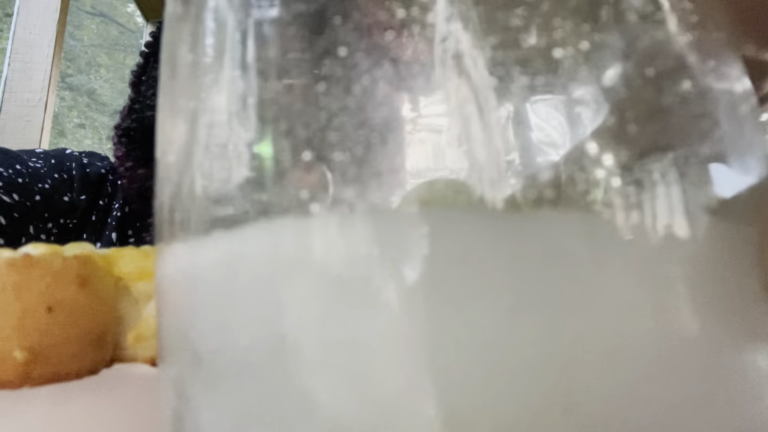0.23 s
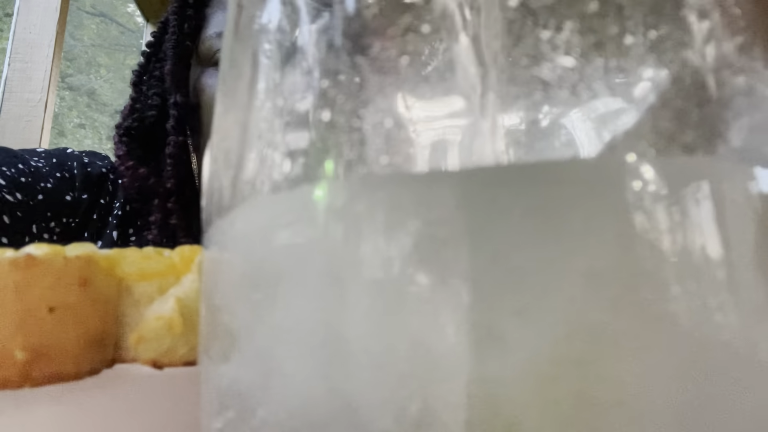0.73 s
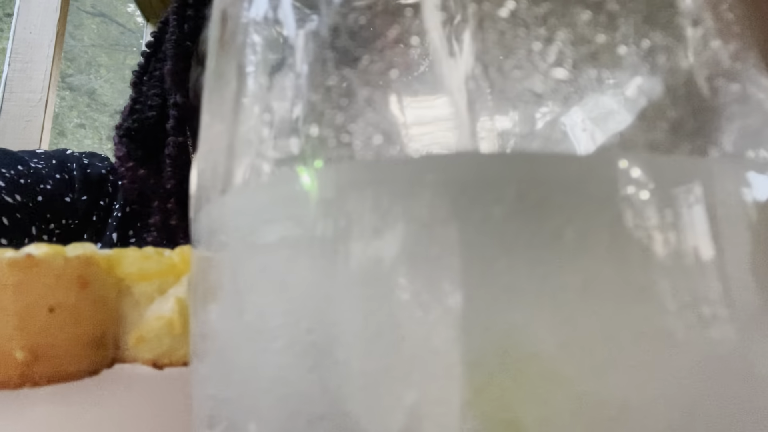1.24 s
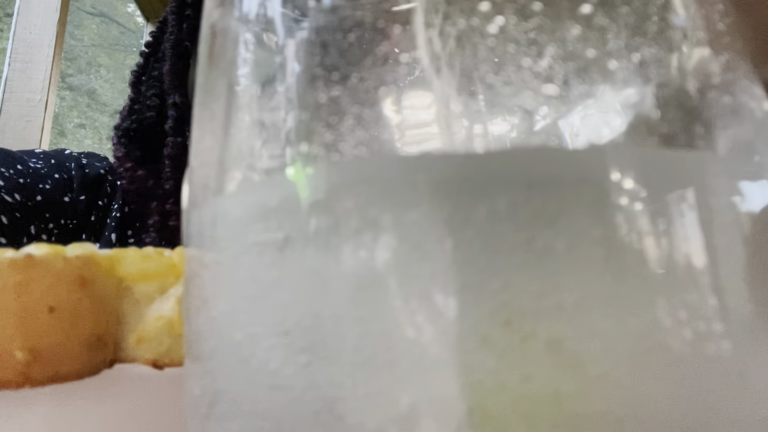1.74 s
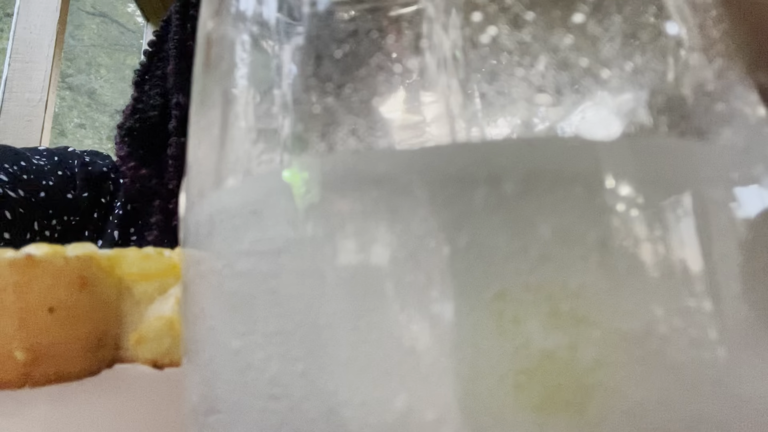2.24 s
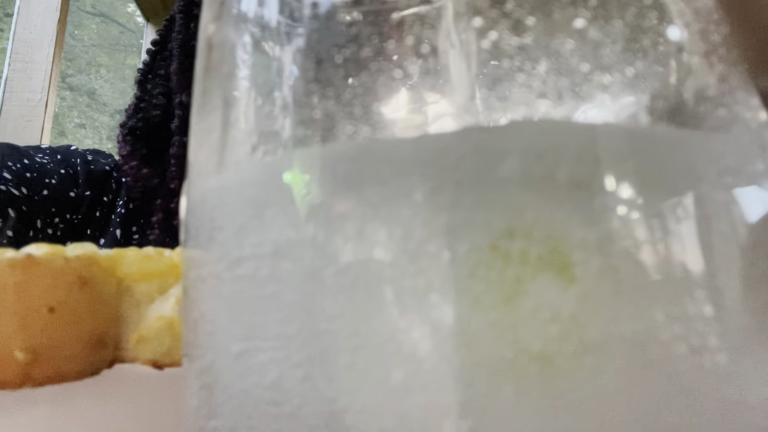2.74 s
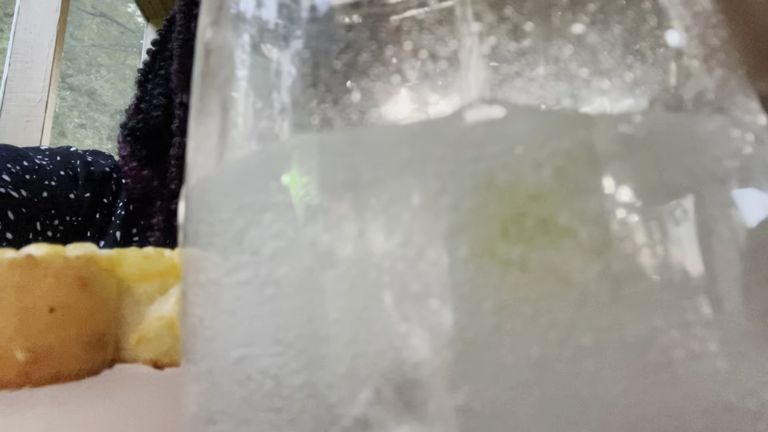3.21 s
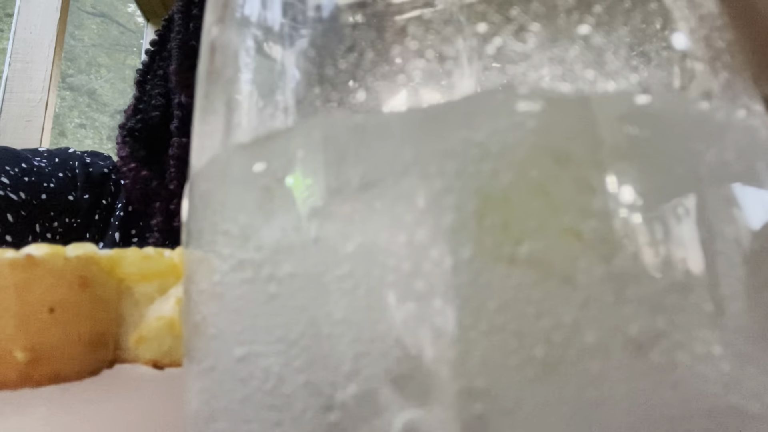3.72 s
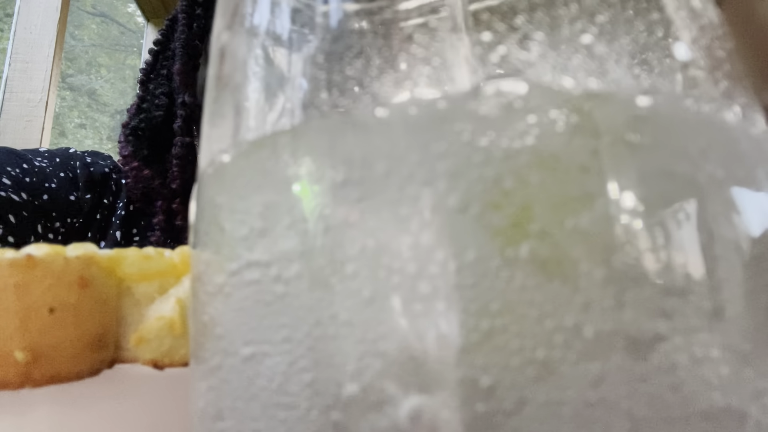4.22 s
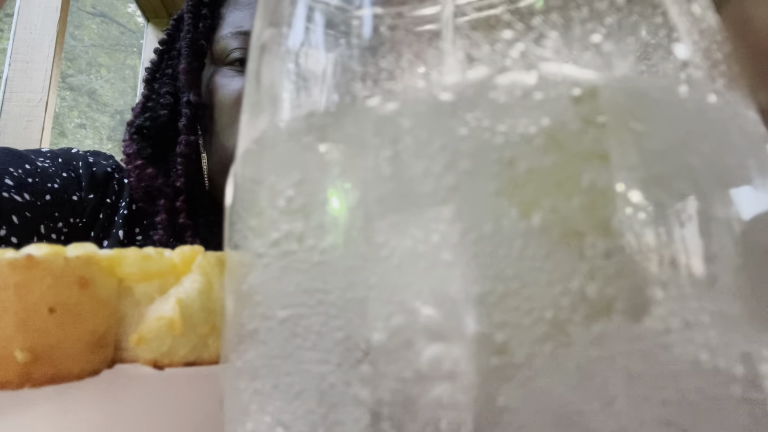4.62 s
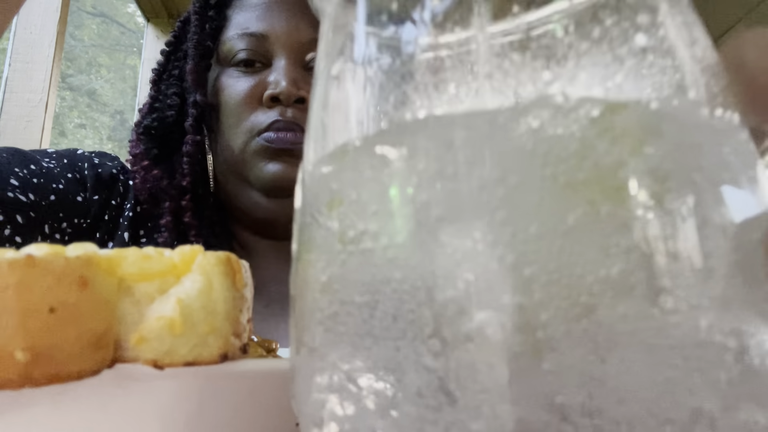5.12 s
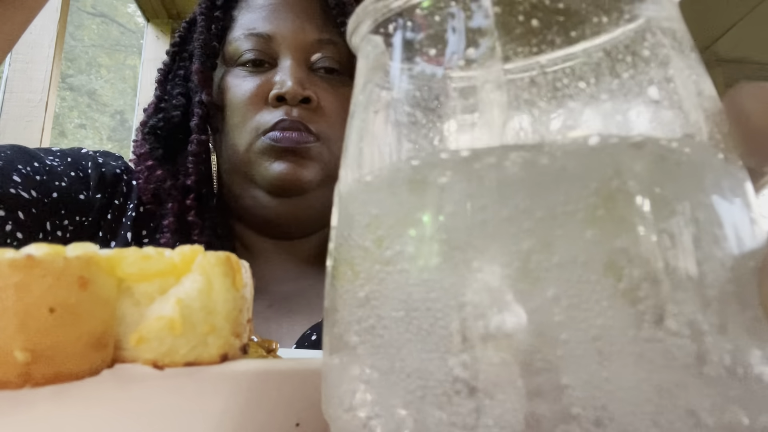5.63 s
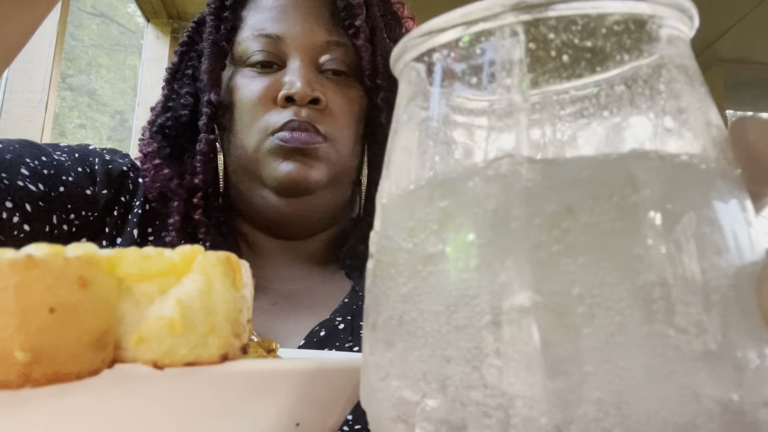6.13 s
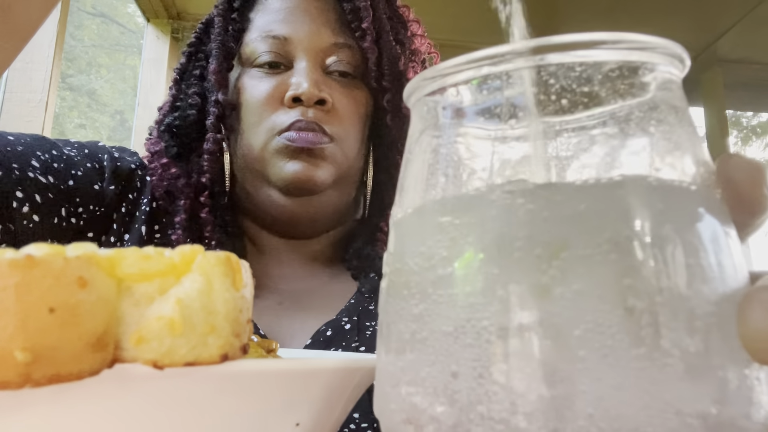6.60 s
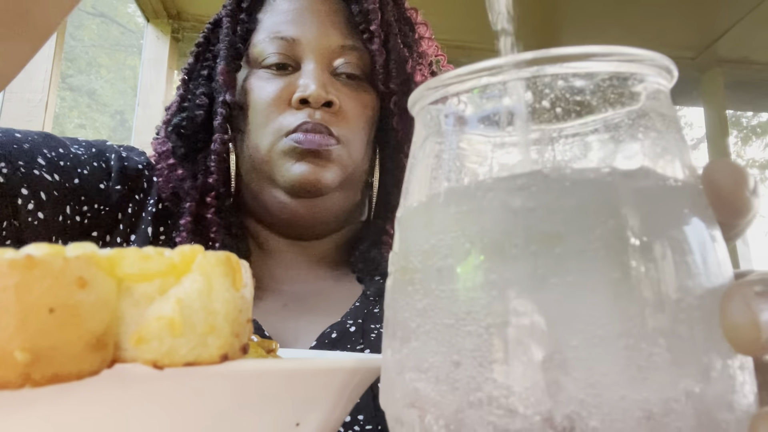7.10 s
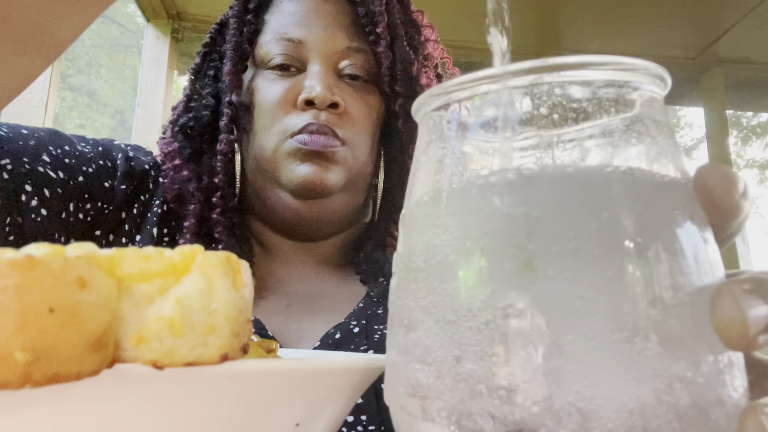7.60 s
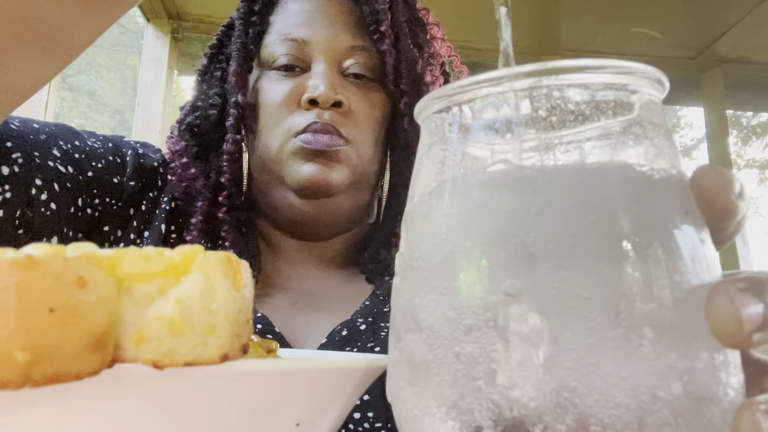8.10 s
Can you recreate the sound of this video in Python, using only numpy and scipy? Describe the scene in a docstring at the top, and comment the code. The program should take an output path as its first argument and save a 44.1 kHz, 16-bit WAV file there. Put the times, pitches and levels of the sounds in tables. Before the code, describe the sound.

Close fizzy pouring into an icy glass jar, with hollow bubbling, steady fine hiss, small glassy ice knocks, and quiet indoor hum.

```python
"""Sparkling water over ice

Indoors, a glass jar of ice and frozen fruit is filled with sparkling water close to a two-port microphone.
The stream drags air under: pulses gurgle and ring the jar's air. Random clicks hiss as foam, bubbles pop,
and ice strikes ringing glass modes. Farther off a house rumbles and hums, a lamp buzzes faintly
and a small bird whistles outside."""
import sys
import numpy as np
from scipy import signal
from scipy.fft import rfft, irfft, next_fast_len
from scipy.io import wavfile
from scipy.ndimage import uniform_filter1d

SR = 44100
rng = np.random.default_rng(int(sys.argv[2]) if len(sys.argv) > 2 else 0)


def output_pcm(signal):
    """Save a mono or channel-first signal as 16-bit PCM at the path in sys.argv[1].

    Samples are clipped to [-1, 1] before scaling.
    """
    pcm = np.clip(np.atleast_2d(signal).T, -1, 1) * 32767
    wavfile.write(sys.argv[1], SR, np.round(pcm).astype(np.int16))


N = 368235
T = np.arange(N) / SR   # s
HZ = np.fft.rfftfreq(next_fast_len(N), 1 / SR)

# strength of the stream, heard as the patter of small bubbles before the wall: start_s, level_db [rms]
STREAM = [(0, -41.5), (.16, -40), (.5, -43), (1.5, -46.5), (1.95, -42), (2.35, -45.5), (3.15, -41.5),
          (3.49, -45), (3.9, -44), (4.3, -43.5), (4.58, -43), (4.9, -47.5), (5.8, -50), (6.3, -45.5),
          (6.85, -40.5), (7.3, -43.5), (8.35, -48)]
# big bubbles, before the wall: peak_s, level_db [peak], pitch_hz
BIG_BUBBLES = [(0.1952, -27, 850), (0.2538, -26.5, 710.0), (0.3445, -24.5, 800), (0.592, -28.5, 870),
               (0.661, -26, 750), (0.823, -23, 780.0), (0.9286, -29, 756), (0.9496, -23.5, 720),
               (1.022, -31, 860), (1.1234, -25, 790), (1.198, -31, 805), (1.2529, -27.5, 780),
               (1.4046, -28, 790), (1.4312, -29.5, 810.0), (1.6574, -24, 778), (1.6656, -26, 830.0),
               (1.698, -24.5, 830), (1.7158, -23, 805), (1.7353, -20, 780), (1.778, -24.5, 750),
               (1.8048, -28, 820.0), (1.816, -24.5, 840.0), (1.875, -24.5, 850), (1.902, -20, 870),
               (1.9113, -25, 750), (1.984, -33, 830), (1.9929, -26, 610), (2.014, -29, 890.0),
               (2.081, -27.5, 820.0), (2.095, -21, 820), (2.157, -29, 890), (2.214, -23.5, 830),
               (2.2366, -26, 800.0), (2.2573, -26, 840.0), (2.3283, -26, 850.0), (2.4231, -29, 815),
               (2.521, -20.5, 840), (2.542, -24, 840.0), (2.5556, -17.5, 825), (2.564, -23, 690),
               (2.6461, -27, 810.0), (2.6824, -25, 860), (2.7231, -20, 770), (2.7916, -22.5, 790),
               (2.8251, -31, 920), (2.9135, -25, 900.0), (2.9976, -28, 950), (3.039, -25, 860.0),
               (3.0603, -22.0, 890), (3.078, -32, 850.0), (3.0914, -23, 860), (3.129, -31, 860.0),
               (3.1769, -20, 880), (3.196, -29, 857), (3.2169, -19, 840), (3.2498, -18.5, 880),
               (3.2804, -24, 890.0), (3.294, -18.5, 850), (3.3031, -24, 800.0), (3.333, -20.5, 923),
               (3.365, -25.5, 930.0), (3.401, -30, 876), (3.419, -26.5, 850.0), (3.4408, -33, 880.0),
               (3.4667, -27, 900.0), (3.596, -23.5, 900), (3.659, -27, 930.0), (3.7154, -28, 913),
               (3.8897, -23.5, 760), (3.9164, -24, 900.0), (3.927, -25, 740), (3.999, -26.0, 900),
               (4.0344, -28, 750.0), (4.054, -21.5, 690.0), (4.0696, -22.5, 680.0), (4.0915, -29, 885),
               (4.101, -28, 690.0), (4.1152, -20.5, 704), (4.1511, -20.5, 730), (4.4514, -32, 730),
               (4.4836, -24, 740), (4.53, -29, 794), (4.602, -26, 880.0), (4.614, -24, 750.0),
               (4.6318, -23.5, 755), (4.6675, -23, 910), (4.7041, -21.0, 860), (4.8964, -12, 1300.0),
               (5.0349, -20.5, 750), (5.074, -28, 700.0), (5.107, -19.5, 720), (5.165, -27, 810.0),
               (5.1803, -20.5, 720), (5.2658, -28, 784), (5.311, -22, 875), (5.3351, -25, 720.0),
               (5.392, -36, 745), (5.409, -23, 760), (5.5526, -25.5, 656), (5.7297, -30.5, 795),
               (5.936, -25.5, 740), (6.0326, -30, 785), (6.31, -28.5, 710), (6.465, -30, 720.0),
               (6.5111, -26, 710), (6.561, -23, 670.0), (6.609, -28.5, 700.0), (6.6454, -18, 764),
               (6.696, -16.5, 700), (6.786, -18, 754), (6.8266, -23.5, 740), (6.932, -27, 600.0),
               (6.9453, -27, 650.0), (6.9997, -27, 683), (7.0287, -20, 630), (7.0448, -24, 610),
               (7.0782, -28, 540), (7.114, -31, 580.0), (7.361, -29, 708), (7.386, -30.0, 670),
               (7.445, -33, 680.0), (7.5324, -26.5, 660.0), (7.568, -29, 680), (8.008, -28, 700.0)]
# air above the water; its bottle tone climbs overall as the jar fills (foam() plays the two rings):
# start_s, bottle_hz, bottle_db [re each bubble], lower_hz, lower_db [rms], upper_hz, upper_db [rms]
JAR_AIR = [(0, 797, -2, 2286, -64, 3460, -87), (1.299, 774, -6.5, 2443, -67.5, 3284, -61),
           (2.5, 830, -2, 2523, -60, 4210, -60), (3.501, 855, -5.5, 2435, -58.5, 4550, -61),
           (4.8, 954, -16, 2572, -69, 4550, -62), (5.4, 1049, -4.5, 2513, -65.5, 4590, -65),
           (6.5, 1090, -13.5, 2634, -63.5, 4580, -75), (7.3, 1190, -15, 2700, -58.5, 4520, -82),
           (8.35, 1230, -7.5, 2780, -57.5, 4580, -73)]
# what the wet glass wall lets through of the gurgle: pitch_hz, level_db
WALL = [(200, 1), (1150, -0.5), (1380, -0.5), (1620, -8), (1900, 1), (2250, -15), (4000, -2), (16000, -20)]
BUBBLE_LEAD_S = .0012   # a big bubble starts this long before its peak
SMALL_LOW_HZ, SMALL_HIGH_HZ = 522, 1178   # pitches of the small bubbles


def gurgle():
    """Each bubble is a short pulse at its own pitch and sets the bottle tone of the jar ringing."""
    tone_s, tone_hz, tone_db = np.transpose(JAR_AIR)[:3]
    when, size, tone = rng.random((3, 2900))
    small_hz = SMALL_LOW_HZ + (SMALL_HIGH_HZ - SMALL_LOW_HZ) * tone ** 1.1
    small = np.c_[when * N / SR, -3.8 * np.log(size + .08), small_hz]
    big = np.array(BIG_BUBBLES) - [BUBBLE_LEAD_S, 0, 0]

    def with_bottle_tone(rows):
        """The pulses plus the answer of the jar, each slightly detuned."""
        at = rows[:, 0]
        detune = 2 ** (0.082 * rng.standard_normal(len(at)))
        jar_db = rows[:, 1] + np.interp(at, tone_s, tone_db)
        jar = np.c_[at, jar_db, np.interp(at, tone_s, tone_hz) * detune]
        pulses = bubbles(rows, cycles=9.5, swell=0.06, rise=0.012, rough=0)
        return pulses + bubbles(jar, cycles=16.4, swell=0.63, rise=0.00052, rough=0)

    stream_db, = in_time(STREAM)
    patter = from_db(stream_db) * rms_one(with_bottle_tone(small))
    return filtered(patter + with_bottle_tone(big), response(WALL))


# the foam settles and the jar is drawn away: start_s, hiss_db [rms], sizzle_db [rms]
FOAM = [(0, -44.5, -49), (.9, -46.5, -55), (2.3, -48.5, -47.5), (3.4, -47, -51), (3.7, -50, -47),
        (4.6, -46.5, -53), (5.2, -45, -64), (6.4, -50, -55.5), (7.2, -52, -53), (8.35, -56.5, -54)]
# colour of the foam hiss: pitch_hz, level_db [relative, per Hz]
HISS = [(300, 9), (900, 9), (1300, -1), (1620, -10), (1900, 1.5), (2250, -20), (2600, -8.5), (3900, -4),
        (5200, 4), (7000, 3.5), (7800, -1.5), (9300, -2.5), (16000, -7)]
# colour of the fresh, deep foam on top of the hiss: pitch_hz, level_db
FRESH = [(1500, -3.5), (2340, -3), (2750, -2), (3430, 12), (4050, -5), (4640, 5.5), (5400, -5),
         (6200, -1.5), (16000, 5)]
# colour of the fine spray: pitch_hz, level_db [relative, per Hz]
SIZZLE = [(6000, 4), (8500, 10), (10500, 0.5), (12500, -0.5), (14500, 2), (16000, -32)]
FRESH_UNTIL_S = 1.46   # the fresh colour is gone by then
LOWER_WIDTH_HZ, UPPER_WIDTH_HZ = 230, 480   # half widths of the two air rings


def foam():
    """Tiny bubbles burst by the thousand; finer spray sizzles above; the air in the jar rings along."""
    flicker = from_db(1.2 * drift(25))
    hiss = coloured(grains(9000 * flicker, spread_db=3.0), HISS)
    fresh = np.clip(1 - T / FRESH_UNTIL_S, 0, 1) ** .5
    hiss = (1 - fresh) * hiss + fresh * filtered(hiss, response(FRESH))
    sizzle = coloured(grains(5000 * flicker, spread_db=3.0), SIZZLE)
    hiss_db, sizzle_db = in_time(FOAM)
    lower_hz, lower_db, upper_hz, upper_db = in_time(JAR_AIR)[2:]
    air = from_db(lower_db) * air_ring(lower_hz, LOWER_WIDTH_HZ)
    air = air + from_db(upper_db) * air_ring(upper_hz, UPPER_WIDTH_HZ)
    return from_db(hiss_db) * hiss + from_db(sizzle_db + 2.24 * drift(13)) * sizzle + air


def air_ring(hz, half_width_hz):
    """Grains smoothed into a band about zero hertz, carried up onto a moving resonance."""
    carrier = 2 * np.pi * np.cumsum(hz) / SR
    band = 1 / (1 + (HZ / half_width_hz) ** 4)
    a, b = (filtered(grains(900, spread_db=5.0), band) for _ in range(2))
    return rms_one(a * np.cos(carrier) + b * np.sin(carrier))


# bubbles bursting on top, nominal levels before the ragged noise: start_s, level_db [peak], pitch_hz
POPS = [(.0598, -24, 7400), (.2666, -29, 12400), (.5685, -28, 11000), (.7893, -34, 6240),
        (1.0926, -35, 6070), (1.1415, -33, 11800), (1.2592, -31, 10800), (1.7528, -31, 7400),
        (2.1927, -27.5, 12200), (2.5902, -30.5, 12000), (2.7082, -35, 5200), (2.9369, -33, 7200),
        (3.2072, -34, 12200), (3.4384, -28, 7440), (3.4592, -28.5, 7050), (3.575, -36, 11400),
        (3.6557, -26, 10340), (3.7, -30, 11460), (3.7485, -33, 11300), (3.8566, -30, 7200),
        (3.911, -37, 11000), (4.0672, -29, 10100), (4.1667, -32, 10130), (4.1851, -30, 6700),
        (4.3552, -35, 6800), (4.4699, -31, 11900), (4.5265, -31, 11800), (5.1352, -27.5, 10600),
        (5.1595, -28, 6900), (5.3007, -29, 6100), (5.935, -29, 11400), (6.5372, -34, 6700),
        (6.5982, -33, 5970), (6.6286, -29.5, 6300), (6.6739, -28, 6730), (6.7343, -31, 6640),
        (6.8126, -28.5, 6300), (7.0132, -28.5, 10400), (7.1082, -35, 6340)]


def pops():
    """Larger bubbles burst, each a bright ragged ring of a few milliseconds; smaller ones crackle between."""
    when, size, tone = rng.random((3, 900))
    at = when * N / SR
    spray_s, _, spray_db = np.transpose(FOAM)
    crackle_db = 5 - 3.5 * np.log(size + .05) + np.interp(at, spray_s, spray_db)   # follows the spray
    crackle = np.c_[at, crackle_db, 5500 * 2 ** (1.25 * tone ** .7)]
    burst = bubbles(POPS, cycles=50.0, swell=0.8, rise=0.0005, rough=0.5)
    burst = burst + bubbles(crackle, cycles=24.0, swell=0.2, rise=0.002, rough=0.6)
    return signal.sosfilt(signal.butter(2, 2600, "high", fs=SR, output="sos"), burst)


# ice on glass: start_s, splash_db [nominal peak], thud_db [through the hand and table],
# spot_hz [pitch that the spot struck favours]
KNOCKS = [(2.156, -30, -54, 3120), (2.553, -44, -24.5, 902), (3.246, -34, -58, 2240),
          (3.4396, -34, -32, 3300), (4.0266, -39, -27.5, 1900), (4.29, -36.5, -44, 1877),
          (4.8963, -35.5, -24, 1450), (5.2323, -30, -38, 1840), (5.308, -35, -31, 1950),
          (5.336, -51, -55, 1950), (5.4041, -36.5, -34, 1850), (5.424, -41, -56, 2200),
          (5.68, -42, -56, 1900), (6.18, -37.5, -78, 1917), (6.6436, -31.5, -35, 1810),
          (6.651, -25, -48, 2150), (6.734, -40, -56, 2600), (6.7863, -32.5, -27.5, 2700),
          (7.1143, -32.5, -30.5, 2570), (7.2056, -27, -33, 2230), (7.47, -35, -60, 3260),
          (7.515, -34, -47, 1500), (7.531, -40, -64, 2600), (7.6, -42, -56, 1900), (8.0857, -37, -56, 1750),
          (8.133, -39, -56, 2680), (8.191, -37, -60, 3300), (8.251, -43, -58, 1840), (8.31, -48, -56, 1840)]
# modes of the wet glass: pitch_hz, level_db [relative], t60_s
GLASS = [(377, -10, .02), (790, 16, 0.041), (1180, -21, 0.017), (1530, -1, 0.017), (1860, 0, 0.027),
         (2040, -11, 0.026), (2510, -11, 0.022), (3090, -9.5, 0.043), (4750, -10, 0.022)]
TABLE_DB, RING_DB = -5.5, -1   # deep part against the thud; ring of the glass against the splash
OFF_SPOT_DB_PER_OCTAVE, BOUNCE_DB = 10.5, -5   # loss away from the favoured pitch; step per rebound


def ice():
    """Each knock rings every glass mode unevenly, rattles through three rebounds, splashes and thuds."""
    s, splash_db, thud_db, spot_hz = np.transpose(KNOCKS)
    thud = bubbles(np.c_[s, thud_db, 0 * s + 280], cycles=1.75, swell=0.3, rise=-0.0085, rough=0)
    deep = bubbles(np.c_[s, thud_db + TABLE_DB, 0 * s + 95], cycles=7.8, swell=0.72, rise=0, rough=0)
    splash = bubbles(np.c_[s, splash_db, 0 * s + 1100], cycles=10.0, swell=0.032, rise=0, rough=0.13)
    splash = signal.sosfilt(signal.butter(2, 2400, fs=SR, output="sos"), splash)
    out = thud + deep + splash
    gaps_s = np.c_[0 * s, rng.uniform(.002, .006, (len(s), 3))]
    touch = ((s[:, None] + np.cumsum(gaps_s, axis=1)) * SR).astype(int)
    for hz, level_db, t60 in GLASS:
        off_spot_db = OFF_SPOT_DB_PER_OCTAVE * abs(np.log2(hz / spot_hz))
        first_db = splash_db + level_db + RING_DB - off_spot_db
        uneven_db = 0.92 * rng.standard_normal(touch.shape)
        clicks = np.zeros(N)
        clicks[touch] = from_db(first_db[:, None] + BOUNCE_DB * np.arange(4) + uneven_db)
        out = out + ring(clicks, hz, t60)
    return out


# bird outside, each time it sings: start_s, level_db
PHRASES = [(2.086, -48.5), (2.535, -48.5), (2.983, -46), (3.445, -47.5), (7.305, -48.5), (7.758, -49),
           (8.205, -51)]
# one phrase: start_s, length_s, from_hz, to_hz, level_db [re the phrase]
NOTES = [(.005, .05, 2877, 3060, -1), (.062, .14, 4170, 4346, -3.5), (.2, .11, 3640, 3505, -2.5),
         (.255, 0.048, 2437, 2514, -0.5), (.27, .06, 2780, 2820, -10), (.4, 0.061, 2590, 2683, -8)]


def bird():
    """One phrase of gliding, hoarse whistles, repeated; moving leaves give each its own echoes."""
    out, t = np.zeros(N + 2 * SR), np.arange(SR // 4) / SR
    for start, phrase_db in PHRASES:
        phrase = np.zeros(SR // 2)
        for s, length, from_hz, to_hz, db in NOTES:
            u = np.linspace(0, 1, int(length * SR))
            rasp = rms_one(uniform_filter1d(rng.standard_normal(len(u)), size=180))
            glide_hz = from_hz + (to_hz - from_hz) * np.sqrt(u)
            phase = 2 * np.pi * np.cumsum(glide_hz) / SR + 0.75 * rasp
            swell = np.sin(np.pi * u ** 0.5) * (1 + 0.35 * rasp[::-1])
            phrase[int(s * SR):][:len(u)] += from_db(db) * np.sin(phase) * swell
        yard = rng.standard_normal(len(t)) * from_db(-60 * t / 1.0)   # t60 of 1 s
        yard *= from_db(-6) / np.sqrt(np.sum(yard ** 2))   # echo energy against the direct whistle
        yard[0] += 1
        heard = signal.fftconvolve(phrase, yard)
        out[int(start * SR):][:len(heard)] += from_db(phrase_db) * heard
    return out[:N]


# colour of the room's rumble: pitch_hz, level_db [relative, per Hz]
RUMBLE = [(12, -49), (20, -37), (103, 4.5), (124, 0.5), (161, -11.5), (205, -5.5), (247, -23), (297, -9),
          (344, -22), (480, -13.5), (620, -17), (1060, -120)]
# wavering motor tones: pitch_hz, level_db [nominal rms]
HUM = [(54.5, -51.5), (94, -48), (120, -53), (207, -65.5), (290, -67.5), (1680, -73)]
# where the lamp's buzz rings: pitch_hz, width_hz, level_db [rms]
BUZZ = [(3700, 400, -74), (5790, 90, -75), (8700, 420, -65), (9560, 200, -73)]
RUMBLE_DB, BUZZ_HZ = -44, 60.01   # rms level; mains rate
WHINE_FROM_S, WHINE_HZ, WHINE_DB = 5.4, 842, -59   # a thin motor tone sets in; nominal peak level


def house():
    """Diffuse low rumble, motor tones that waver, a thin one joining late, and resonances clicked at mains rate."""
    rumble = from_db(RUMBLE_DB) * coloured(rng.standard_normal((3, N)), RUMBLE)
    hum = np.zeros(N)
    for hz, db in HUM:
        gain = np.sqrt(2) * from_db(db + 2.5 * drift(9))
        hum += gain * np.sin(2 * np.pi * (hz * T + 0.2 * drift(5)))
    sparks = np.diff(np.floor(T * BUZZ_HZ), prepend=0)
    buzz = np.zeros(N)
    for hz, width_hz, db in BUZZ:
        t60 = np.log(1000) / np.pi / width_hz
        buzz += from_db(db) * rms_one(ring(sparks, hz, t60))
    onset = np.clip((T - WHINE_FROM_S) / 0.12, 0, 1)
    whine = from_db(WHINE_DB + drift(3)) * np.sin(2 * np.pi * WHINE_HZ * T) * onset
    return rumble + hum + buzz + whine * [[1], [0], [0]]   # the whine is in the direct row only


def scattered(x, t60):
    """The direct sound and two versions scattered by things nearby; the paths change as the jar moves."""
    t = np.arange(int(.04 * SR)) / SR
    paths = rng.standard_normal((4, len(t))) * from_db(-60 * t / t60)
    paths /= np.sqrt(np.sum(paths ** 2, axis=1, keepdims=True))
    heard = signal.fftconvolve(x[None], paths, axes=1)[:, :N]
    turn = 2 * np.pi * T * [[2.3], [3.1]]   # Hz, left and right
    return np.vstack([x, np.cos(turn) * heard[:2] + np.sin(turn) * heard[2:]])


# microphone ports: pitch_hz, lag_rad [right behind left is negative], common [share of power in both],
# balance_db [left minus right]
PORTS = [(0, .4, .9, 0), (200, .3, .6, 0), (350, .6, .5, .5), (600, 1.5, .85, -2), (860, 2.35, .95, -4.5),
         (1150, 2.6, .85, -6.5), (1400, 2.5, .7, -2.5), (1700, 3.5, .75, 0), (2700, 5.4, .3, -3),
         (3500, 6.3, .5, 1), (4800, 7.6, .5, -4), (5600, 9.4, .25, -5), (6100, 11.5, .5, -4),
         (6700, 10.8, .3, -3), (7700, 10.2, .8, -1), (9100, 9.42, .93, 0), (10300, 7.8, .75, 0),
         (11600, 6.28, .98, 0), (13000, 4.6, .75, 0), (14250, 3.14, .98, 0), (16000, 1.1, .6, 0)]


def ports(sound):
    """Rows direct, scattered left, scattered right to two ports that differ in phase and level."""
    hz, lag, common, balance_db = np.transpose(PORTS)
    lag, balance_db = np.interp(HZ, hz, lag), np.interp(HZ, hz, balance_db)
    common = np.interp(HZ, hz, np.clip(common, 0, 1))
    side = np.array([[.5], [-.5]])   # left, right
    balance = from_db(balance_db * side)
    direct = filtered(sound[0], np.sqrt(common) * np.exp(-1j * lag * (side + .5)) * balance)
    return direct + filtered(sound[1:], np.sqrt(1 - common) * balance)


def bubbles(rows, cycles, swell, rise, rough):
    """Each (s, peak dB, Hz) pulse swells over `swell` cycles, falls 60 dB over `cycles` and bends by `rise`."""
    out, t = np.zeros(N + 1000), np.arange(1000) / SR
    for (s, db, hz), noise in zip(rows, rng.standard_normal((len(rows), 1000))):
        turns = hz * t
        shape = (1 - np.exp(-turns / swell)) ** 2 * from_db(-60 * turns / cycles)
        wave = np.sin(2 * np.pi * turns * (1 + rise * turns)) + rough * noise
        at = int(np.clip(s * SR, 0, N - 1))
        out[at:at + 1000] += from_db(db) * wave * shape / shape.max()
    return out[:N]


def grains(per_s, spread_db):
    """Three unrelated streams of random clicks with a long tail of large ones."""
    sizes = from_db(spread_db * np.minimum(rng.exponential(1, (3, N)), 6))
    signs = rng.choice([-1, 1], (3, N))
    return sizes * signs * (rng.random((3, N)) < per_s / SR)


def ring(x, hz, t60):
    """A unit click sets a decaying sine, of height about 1, ringing."""
    r, w = from_db(-60 / (t60 * SR)), 2 * np.pi * hz / SR
    return signal.lfilter([0, np.sin(w)], [1, -2 * r * np.cos(w), r * r], x + 1e-18)


def drift(rate_hz):
    """Slow chance of spread 1, smoothed at 40 knots a second and joined by straight lines."""
    knots = rng.standard_normal(int(N / SR * 40) + 4)
    r = np.exp(-2 * np.pi * min(rate_hz, 30) / 40)
    smooth = rms_one(signal.lfilter([1], [1, -r], knots))
    return np.interp(T * 40, np.arange(len(knots)), smooth)


def coloured(x, spectrum):
    """Give x the (Hz, dB) colour; rms 1."""
    return rms_one(filtered(x, response(spectrum)))


def filtered(x, gain):
    """Multiply the spectrum by a gain given on HZ."""
    size = next_fast_len(N)
    return irfft(rfft(x, size) * gain, size)[..., :N]


def response(spectrum):
    """Gain on HZ of a (Hz, dB) table; -90 dB above its last row."""
    hz, db = np.transpose(spectrum)
    return from_db(np.interp(np.log(HZ + 1), np.log(hz), db, right=-90))


def in_time(rows):
    """The columns of (s, ..) rows, sample by sample."""
    s, *columns = np.transpose(rows)
    return [np.interp(T, s, c) for c in columns]


def rms_one(x):
    """Scale to rms 1."""
    return x / np.sqrt(np.mean(x ** 2) + 1e-20)


def from_db(db):
    """Decibels to gain."""
    return 10 ** (np.asarray(db) / 20)


def scene():
    """All sources at the two ports; the gurgle, pops, ice and bird are scattered on the way."""
    events = gurgle() + pops() + ice() + bird()
    return ports(scattered(events, t60=.02) + foam() + house())


def record(dry):
    """The microphone chain cuts the deepest bass and everything near and above 16 kHz."""
    dry = signal.sosfilt(signal.butter(2, 25, "high", fs=SR, output="sos"), dry)
    return signal.sosfilt(signal.ellip(12, .5, 65, 15870, fs=SR, output="sos"), dry)


dry = scene()
out = record(dry)
output_pcm(out)
```